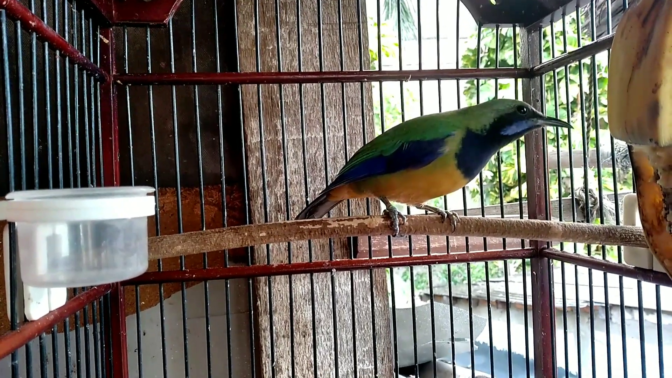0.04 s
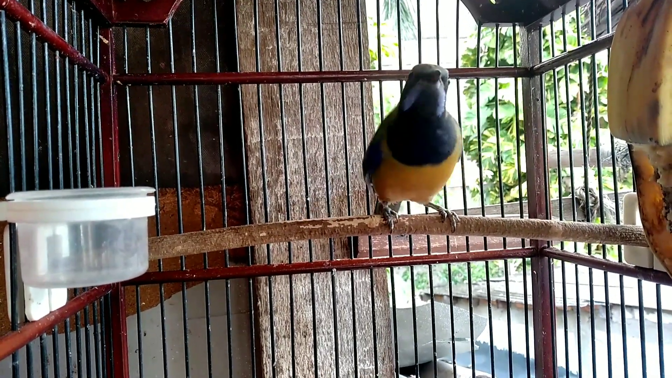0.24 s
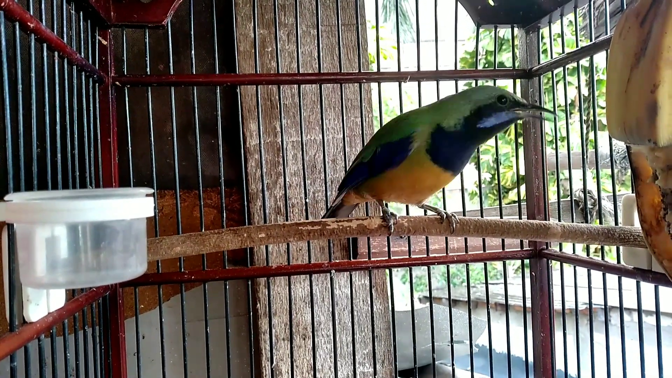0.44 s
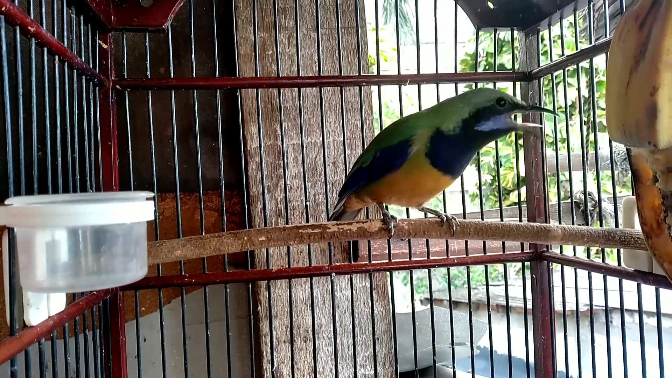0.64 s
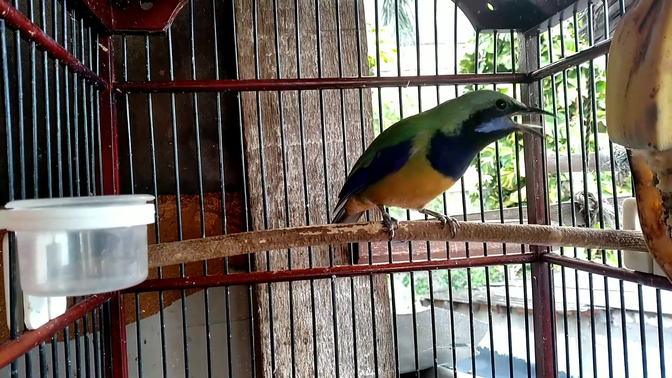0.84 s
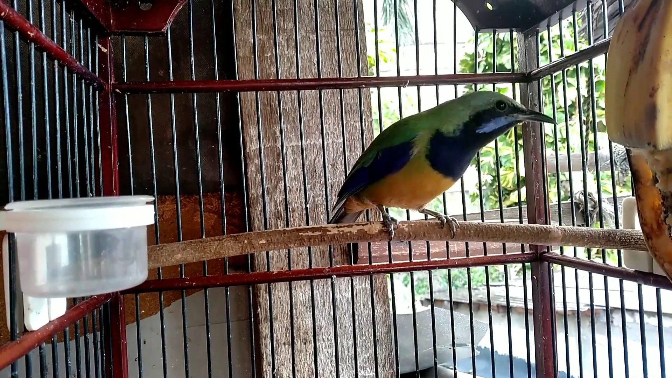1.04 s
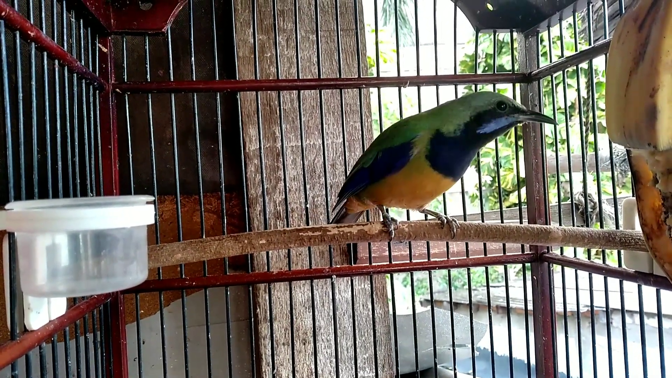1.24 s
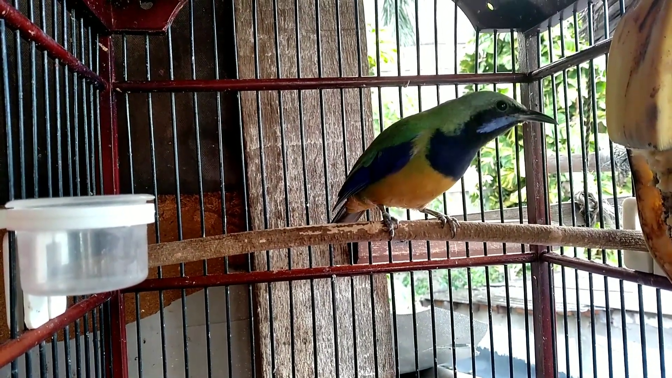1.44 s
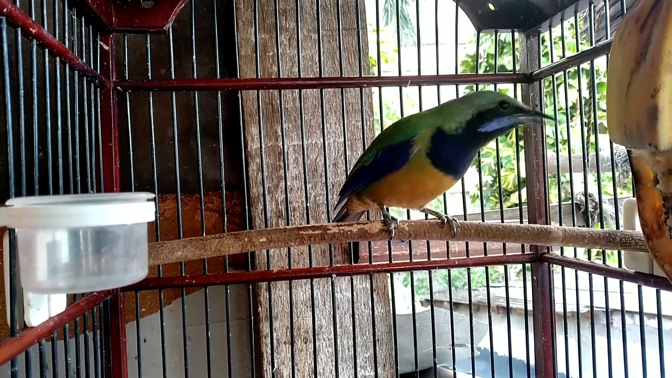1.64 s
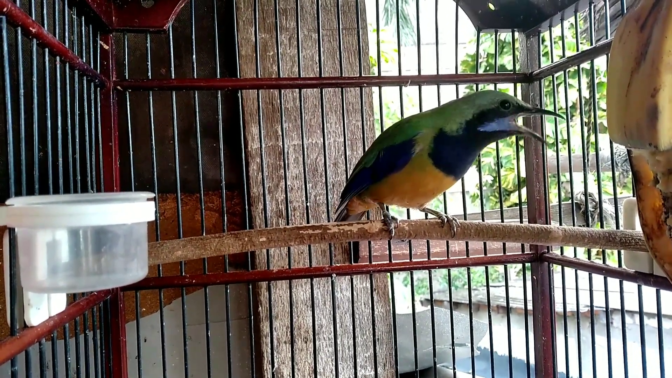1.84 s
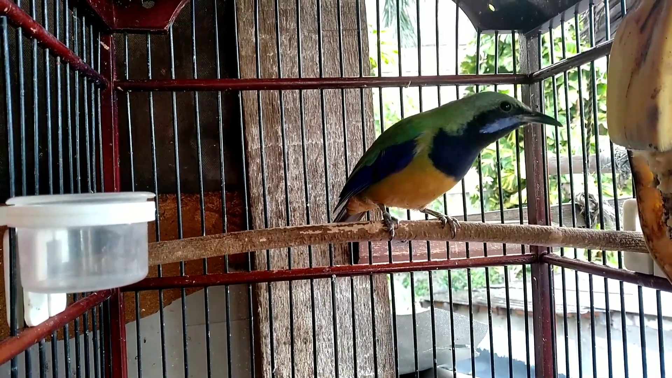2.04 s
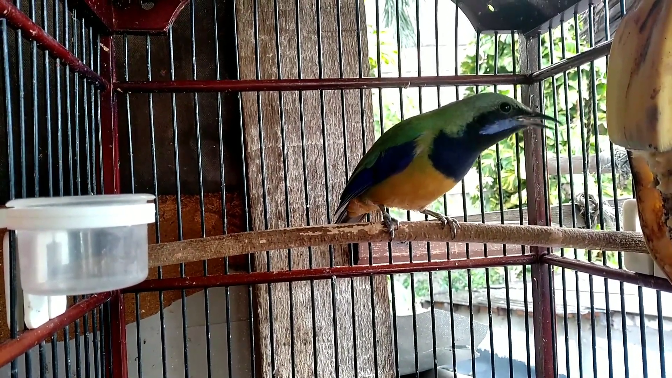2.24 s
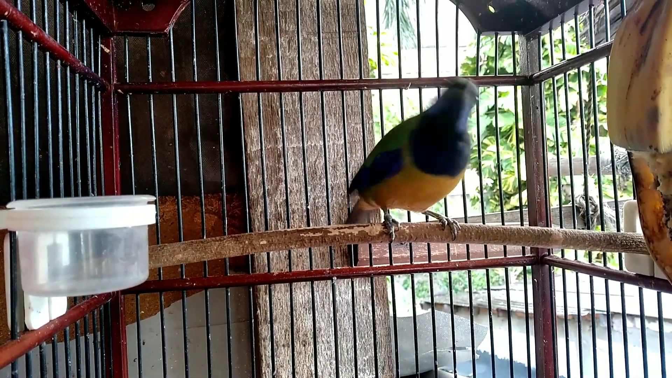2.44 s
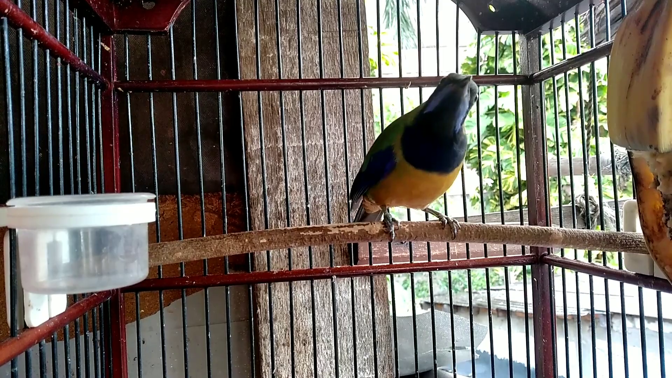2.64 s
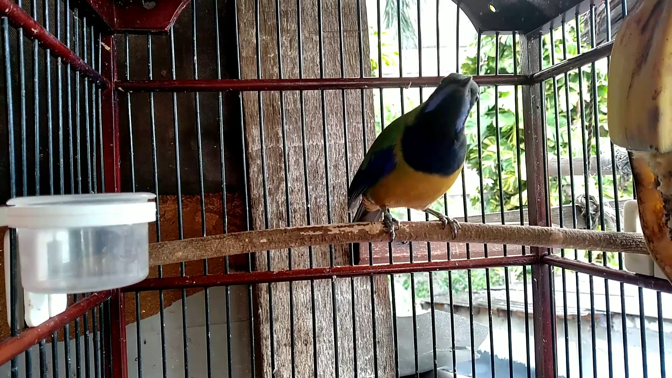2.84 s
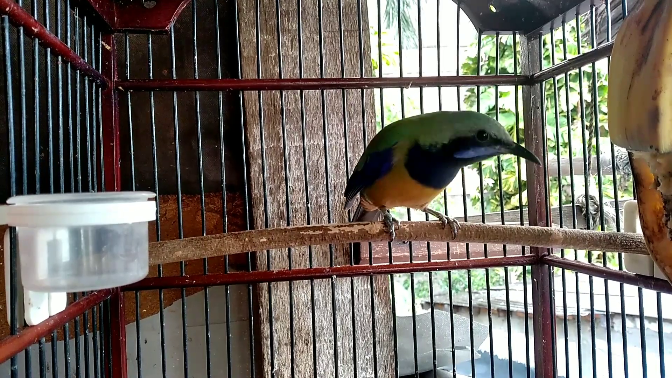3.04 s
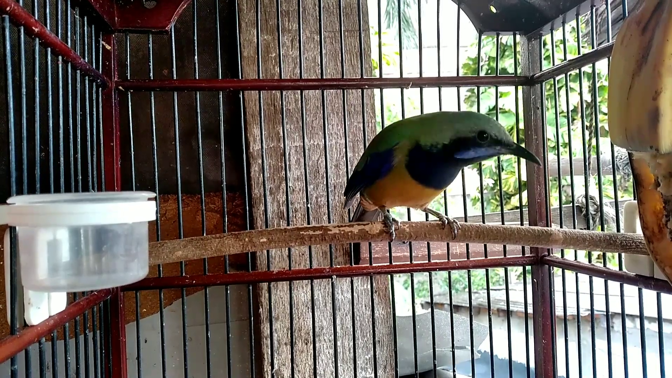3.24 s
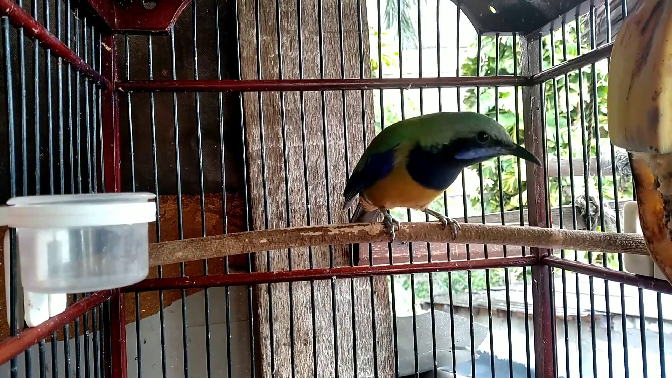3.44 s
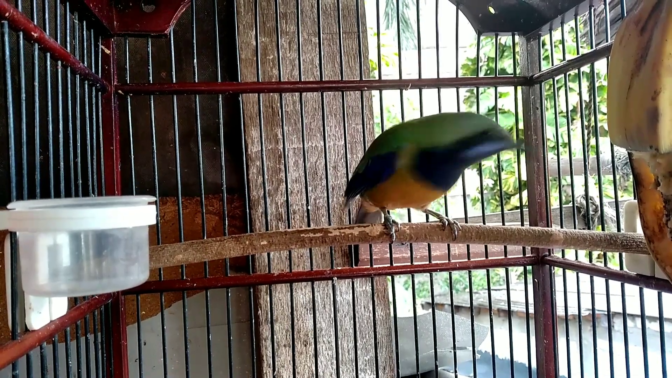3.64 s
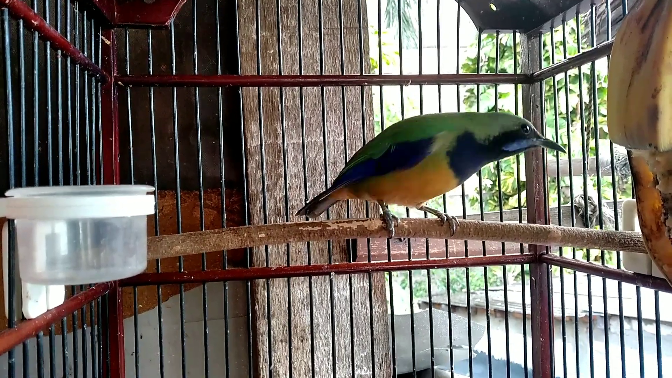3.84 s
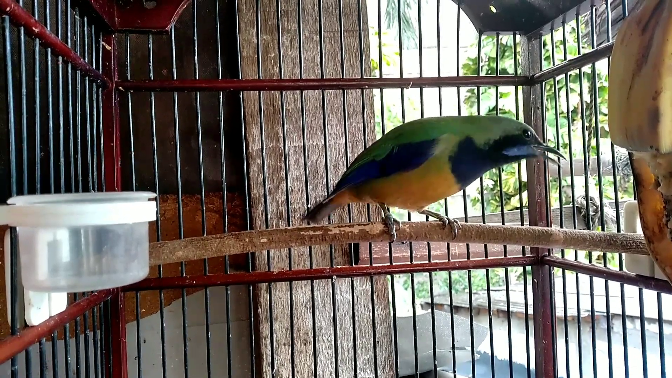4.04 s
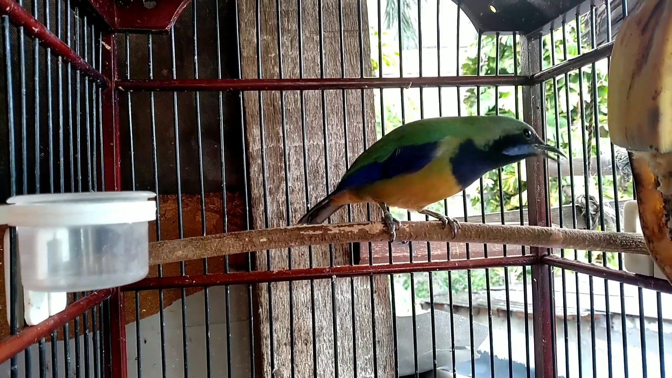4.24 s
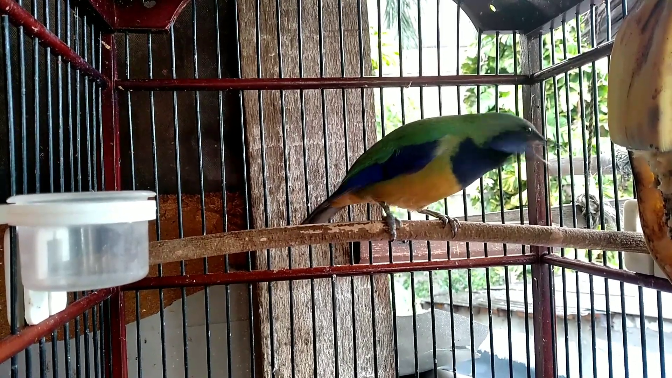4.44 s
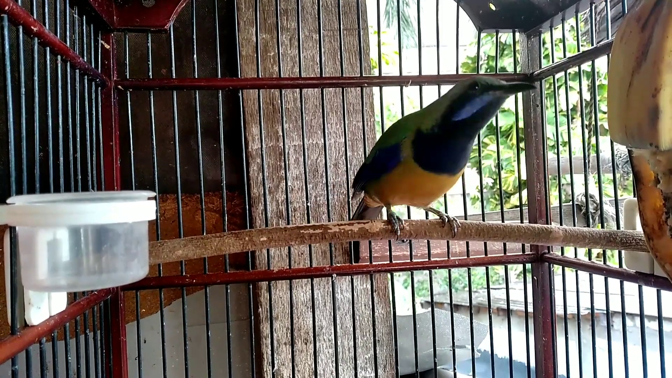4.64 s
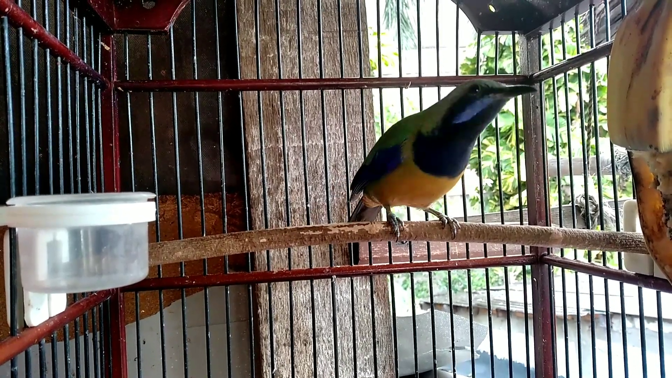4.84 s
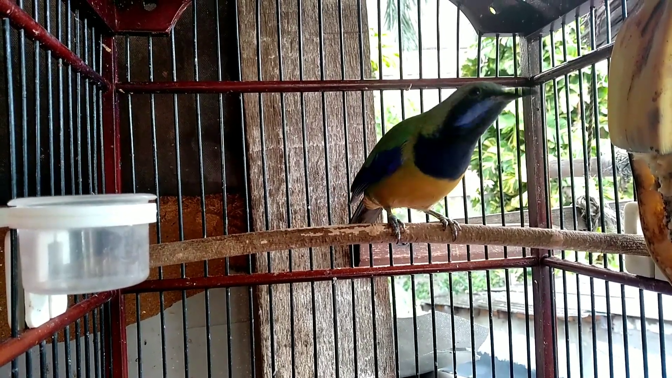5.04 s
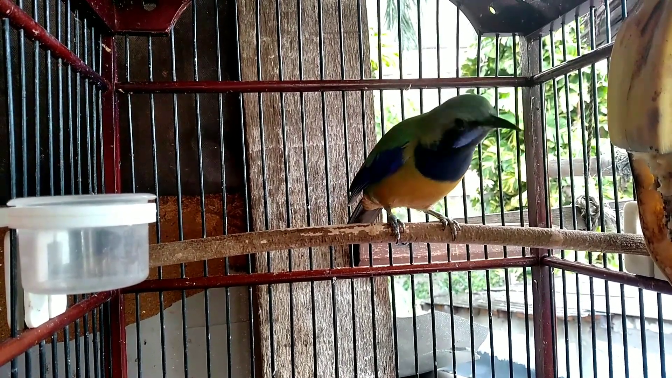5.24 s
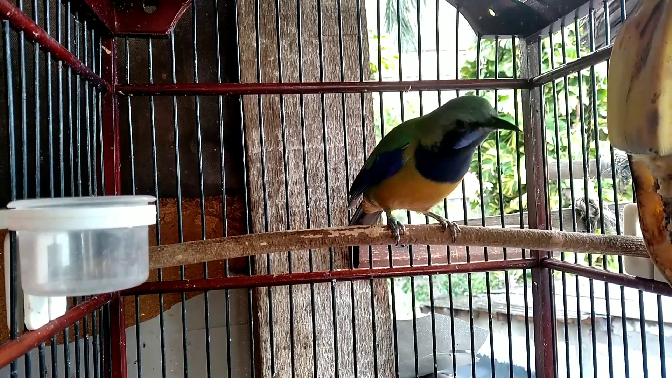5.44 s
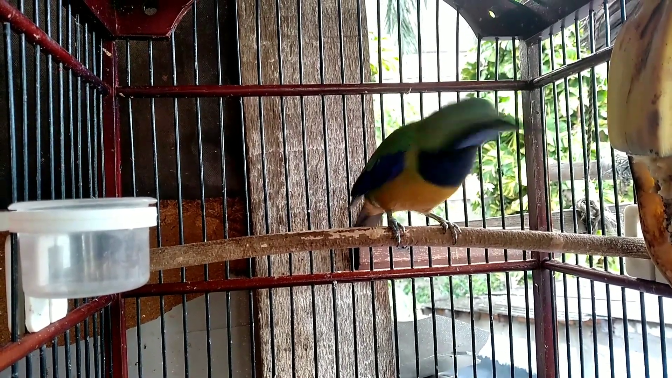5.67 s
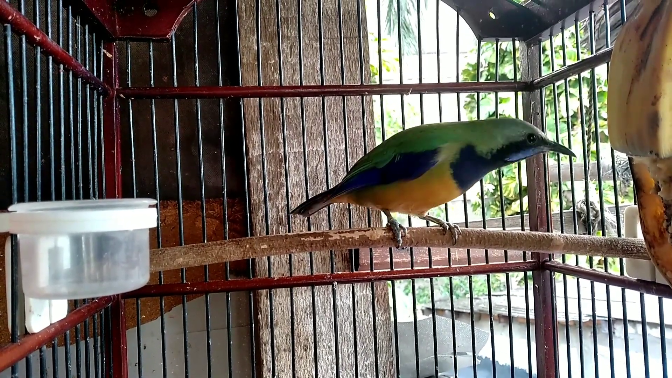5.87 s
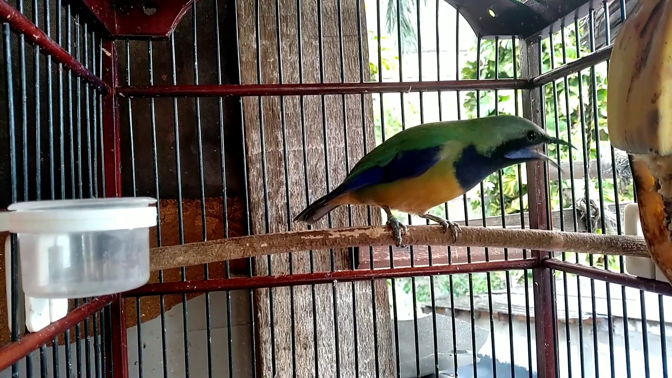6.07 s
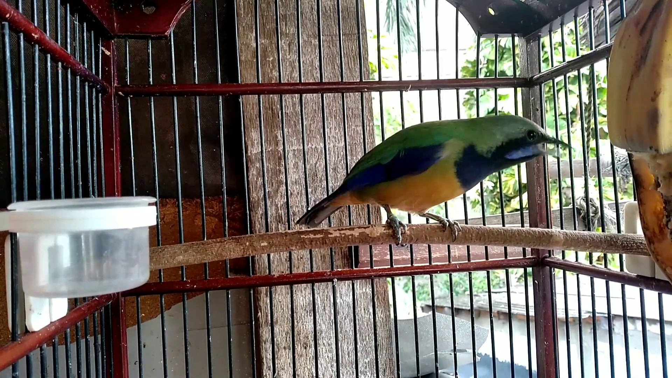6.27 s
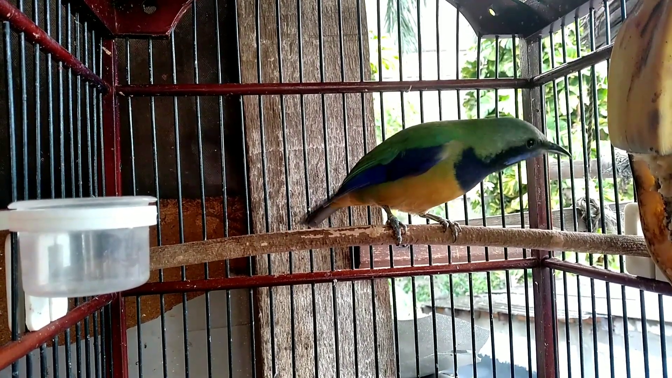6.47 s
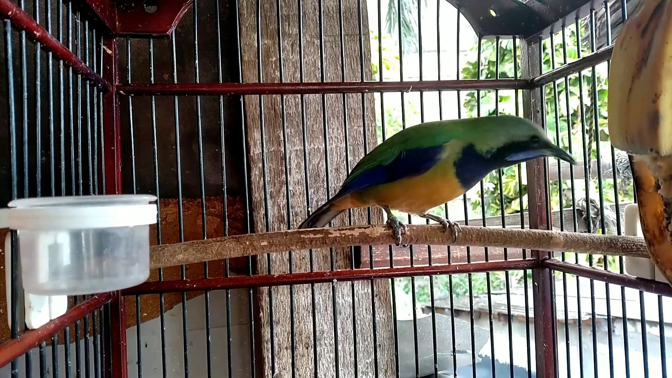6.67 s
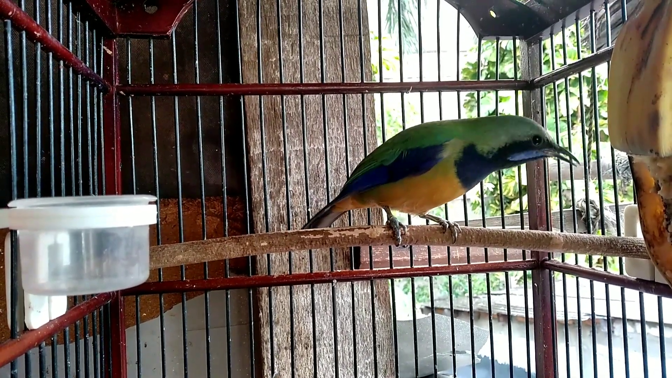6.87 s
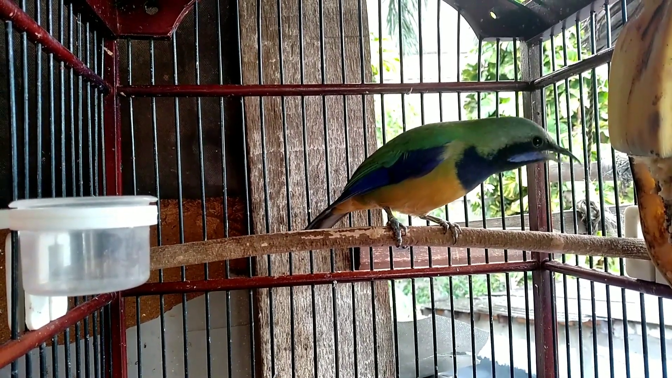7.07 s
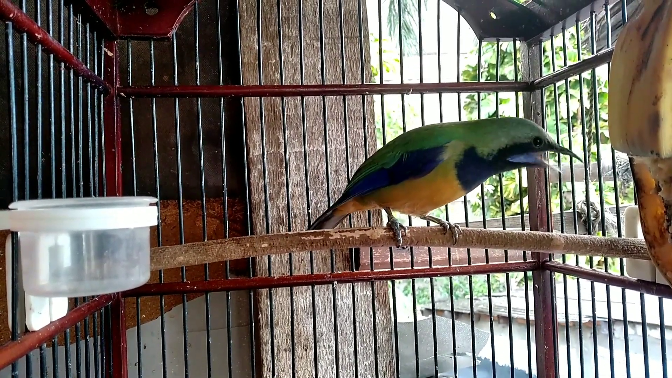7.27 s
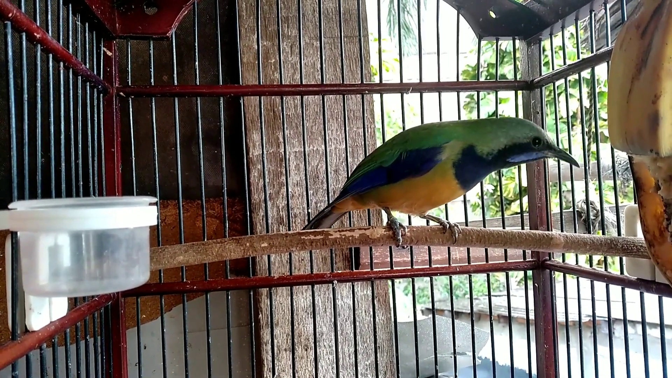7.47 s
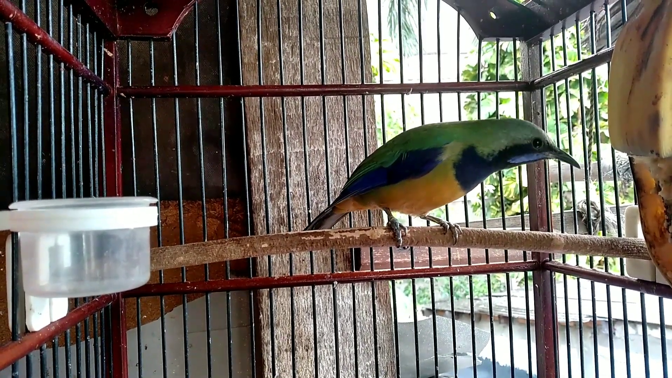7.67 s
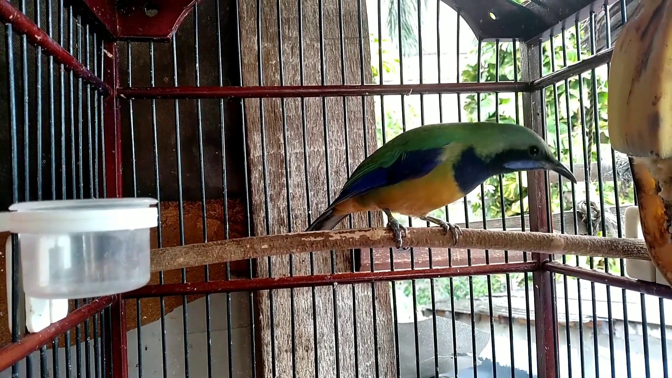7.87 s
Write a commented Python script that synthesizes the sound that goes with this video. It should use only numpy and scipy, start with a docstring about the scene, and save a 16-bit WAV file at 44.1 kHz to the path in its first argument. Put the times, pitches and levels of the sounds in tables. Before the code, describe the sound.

Loud, scratchy scolding calls from a bird very near the microphone, each starting with a tiny chirped note that breaks into hissing rasp. They come in groups, with one falling double squawk early on and quiet peeps and rustling midway. Cage wires ring faintly once, distant birds whistle softly, and a lumpy low hum with outdoor air fills the gaps in a small open space.

```python
"""An uneven low hum and outdoor noise are heard first; then a caged leafbird scolds close to a stereo microphone.
Most of its calls are an arched, nearly regular note that breaks into a rasp of chaotic slaps and hiss.
One call is a two-part squawk: a rising pulse train under a sinking resonance.
Soft peeps, rustles of filtered friction noise, ringing cage wires, far whistles and a thin whine surround it.
Short cage echoes, a small open room and two microphone ports shape the sound."""
import sys
import numpy as np
from scipy import signal
from scipy.fft import rfft, irfft, next_fast_len
from scipy.io import wavfile
from scipy.ndimage import uniform_filter1d, map_coordinates

SR = 44100
rng = np.random.default_rng(int(sys.argv[2]) if len(sys.argv) > 2 else 0)


def master(y):
    """Save y as 16-bit WAV."""
    cut = np.clip(np.atleast_2d(y).T, -1, 1)
    pcm = np.round(cut * 32767)  # scale
    wavfile.write(sys.argv[1], SR, pcm.astype(np.int16))


N = 348831
TIME, FREQS = np.arange(N) / SR, np.fft.rfftfreq(N, 1 / SR)

# Levels in the tables are relative: the gains of the mix come after them.
# Slow course of the low background: start_s [s], hum_db [dB], rumble_db [dB]
LOW_LEVELS = [(0.0, -38, -54), (0.81, -39, -45), (2.029, -51.5, -53), (2.23, -34.5, -43),
              (4.05, -36.5, -46), (4.46, -46, -51.5), (5.87, -33.5, -47.5), (6.28, -43, -56),
              (6.89, -35, -46.5), (7.9, -36.5, -44.5)]
# Spectrum of the rumble: frequency_hz [Hz], density_db [dB per Hz]
RUMBLE_SPECTRUM = [(30, -32), (60, -6), (110, 5.5), (160, 3), (220, 7), (300, -1.5), (430, -1), (600, -54)]
# Spectrum of the noise that accompanies the hum: frequency_hz [Hz], density_db [dB per Hz]
BOOM_SPECTRUM = [(20, -41), (65, 7), (130, 5.5), (280, -22.0), (450, -71.5)]
# Spectrum of the outdoor noise: frequency_hz [Hz], density_db [dB per Hz]
AIR_SPECTRUM = [(150, -35.5), (250, -28.5), (405, -5.5), (489, 0.5), (739, -3.5), (893, -5), (957, -9),
                (1180, -10.5), (1630, -13.5), (2260, -11.5), (3540, -19), (12200, -23.5), (14300, -34.5),
                (15300, -40.5)]
# Thin treble tone that stops part way: pitch_hz [Hz], level_db [dB], end_s [s]
WHINE = (14002, -74, 5.9)
# Whistles far outside: start_s [s], length_s [s], first_hz [Hz], middle_hz [Hz], last_hz [Hz], level_db [dB]
FAR_WHISTLES = [(0.996, 0.63, 1328, 1244, 1112, -52), (3.046, .24, 1130, 1184, 1268, -50.5),
                (4.976, .55, 1344, 1242, 1100, -51)]
# Rustles of feathers and feet: start_s [s], length_s [s], level_db [dB]
RUSTLES = [(2.223, 0.15, -35.5), (2.758, 0.091, -46), (4.718, 0.089, -48.5), (4.839, 0.12, -51),
           (5.076, 0.12, -36.5)]
# Spectrum of a rustle: frequency_hz [Hz], density_db [dB per Hz]
RUSTLE_SPECTRUM = [(470, -50.5), (800, -22), (2210, -6), (2500, -9), (2830, -4), (5420, -10), (10300, -12),
                   (13300, -39), (15000, -25)]
# Modes of the cage wires: pitch_hz [Hz], level_db [dB], t60_s [s]
WIRES = [(1646, -44, 1), (2060, -33, 0.3), (2755, -43.5, 0.63)]
# Soft peeps: start_s [s], length_s [s], first_hz [Hz], middle_hz [Hz], last_hz [Hz], level_db [dB]
PEEPS = [(4.617, 0.046, 3190, 3410, 3360, -41), (4.815, 0.032, 4300, 4370, 4370, -36),
         (4.904, 0.029, 6200, 6140, 6200, -39), (4.928, 0.0585, 6210, 5910, 6330, -47.5)]
# Syllables of the squawk: start_s [s], length_s [s], top_pitch_hz [Hz], level_db [dB]
SYLLABLES = [(2.501, .103, 920, -5), (2.595, 0.073, 854, -8.5)]
# Radiation of the squawk, the small bill sending out little bass: frequency_hz [Hz], gain_db [dB]
BILL_RADIATION = [(400, -19.5), (1000, -7.5), (1500, 1), (4300, -3), (5300, -6.5)]
# Source strength of harmonics 1, 2, .. of an opening note: level_db [dB]
NOTE_PARTIALS = [0, -3, -24, -25, -27]
# Response of the throat: frequency_hz [Hz], gain_db [dB]
THROAT = [(300, -49.5), (800, -29.5), (1100, -19), (1300, -30), (1580, -11), (1850, -17), (2450, -7),
          (3100, -7), (3400, -4), (3950, 3.5), (4400, -3), (5200, -23), (7000, -25.5), (15000, -58)]
# Spectrum of air in the open bill: frequency_hz [Hz], density_db [dB per Hz]
HISS = [(500, -51.5), (1100, -23.5), (1600, -6), (2700, -11), (4300, 5.5), (5200, 2.5), (6000, -2.5),
        (7100, -4), (8000, -3.5), (8800, -4), (11000, -4), (12200, -9.5), (14000, -9), (15500, -35)]
# Scolding calls: rasp_start_s [s], rasp_length_s [s], level_db [dB], hiss_against_throat_db [dB],
# rattle_depth [0-1], note_lead_s [s], note_top_hz [Hz; 0 means no opening note]
SCOLDS = [(0.3, 0.14, -12, -0.5, 0.93, .019, 1014), (.576, 0.12, -11, -8.5, 0.42, 0.027, 1179.5),
          (0.816, .13, -11, -7, .85, 0.03, 1440.5), (1.651, 0.26, -13.5, 4.5, .4, 0.0094, 0),
          (2.095, .15, -11.5, -5, 0.63, 0.025, 1247), (4.038, 0.21, -13, 3.5, 0, 0.026, 0),
          (4.356, .13, -12, -4.5, 0.8, 0.031, 1141.5), (6.01, 0.17, -12.5, -1.2, 0.2, 0.02, 983),
          (6.281, 0.12, -13, -5, .45, .028, 1509), (6.519, 0.12, -14, -4, 0.2, 0.025, 1372.5),
          (6.753, 0.13, -11.5, -9, 0.7, .024, 1288.5), (6.987, .13, -11.5, -9, 0.47, 0.031, 1357),
          (7.219, .14, -12, -5.5, 0.53, .022, 1462.5)]
# The bird at the two ports: frequency_hz [Hz], left_lead [radians], left_minus_right_db [dB]
PORTS = [(1000, 0, -1.5), (1600, 0, -.5), (2100, -.5, -2), (2400, .8, -3), (2850, -2, 5), (3300, 0, 1),
         (3600, 1.4, 2), (3950, 1.2, -2), (4300, 2.9, -1), (4800, 2.9, -1), (6200, 3.3, -2), (7500, 4.9, 1),
         (9000, 3.5, 1), (11200, 6.3, 7)]
# Colour of the cage echoes: frequency_hz [Hz], gain_db [dB]
CAGE_ECHO = [(200, -13), (1500, -10), (3000, -6), (4200, -10), (5500, -2), (14000, -1)]
# Colour of the room's reflections: frequency_hz [Hz], gain_db [dB]
ROOM_ECHO = [(3000, 0.0), (4200, -4.5), (5500, 2)]

# the hum swells and drops out at random; the rumble shares part of it
SWELL_DB, SWELLS_PER_S, RUMBLE_SHARE = 15, 15, .55
AIR_DB = -48.5
WIRES_START_S = .93
# in each syllable the pitch climbs from below
SCOOP_SHARE, SCOOP_S = .38, .023
# the voice is clear for a moment, then breaks up and weakens
CLEAR_S, CLEAR_FADE_S, ROUGH_CLEAR, ROUGH_BROKEN, BROKEN_DB = 0.0626, 0.013, 0.02004, 0.87, -7
# the bill closes steadily through both syllables, and the throat resonance sinks with it
BILL_OPEN_HZ, BILL_SINK_HZ_PER_S = 4240, 9900
# an opening note arches from and to these shares of its top pitch, and runs on into the rasp
NOTE_FROM, NOTE_TO, NOTE_OVERLAP_S = .64, .9, .012
# a note at full pitch is nearly as loud as its rasp; lower notes are much softer
NOTE_FULL_HZ, NOTE_BELOW_RASP_DB, NOTE_DB_PER_OCTAVE = 1308, -3.5, 34
# shares of a rasp over which it builds: the long ones start more softly
VOICE_RISE_SHARE, HISS_RISE_SHARE = 0.1, 0.11
EDGE_HZ = 15450


def amp(db):
    """Logarithmic level: converts decibels to an amplitude ratio."""
    return 10 ** (np.asarray(db) / 20)


def unit(x):
    """Mean power: scales a signal to rms 1."""
    return x / np.sqrt(np.mean(x ** 2) + 1e-20)


def read(points, hz):
    """Interpolation of a curve on a logarithmic frequency axis."""
    f, value = np.transpose(points)
    return np.interp(np.log(hz + 1), np.log(f), value)


def colour(x, spectrum):
    """Linear filtering: multiplies the spectrum of a sound by a gain curve in dB."""
    size = next_fast_len(x.shape[-1] + 512)
    gain = amp(read(spectrum, np.fft.rfftfreq(size, 1 / SR)))
    return irfft(rfft(x, size) * gain, size)[..., :x.shape[-1]]


def wander(size, hz):
    """Random modulation: smooth chance of rms 1 that changes hz times a second."""
    at = np.arange(size) * hz / SR
    return unit(map_coordinates(rng.standard_normal(4096), [at], order=3, mode="wrap"))


def gate(t, length, rise, fall):
    """Amplitude envelope: a rounded opening and closing."""
    return np.sin(np.pi / 2 * np.clip(np.minimum(t / rise, (length - t) / fall), 0, 1)) ** 2


def add(mix, s, sound):
    """Superposition: sums a sound into the mix from time s."""
    part = mix[..., max(round(s * SR), 0):][..., :sound.shape[-1]]
    part += sound[..., :part.shape[-1]]


def arch(length, first_hz, middle_hz, last_hz, jitter):
    """Frequency modulation: time and phase of a pitch that follows a parabola through three points."""
    t = np.arange(0, length, 1 / SR)
    parabola = np.polyfit([0, .55, 1], [first_hz, middle_hz, last_hz], 2)
    hz = np.polyval(parabola, t / length) * (1 + jitter * wander(len(t), 500))
    return t, 2 * np.pi * np.cumsum(hz) / SR


def noise_pair(spectrum, side):
    """Partial coherence: coloured noise of which both ports share a part."""
    shared, apart = colour(rng.standard_normal((2, N)), spectrum)
    return np.array([unit(shared) + side * unit(apart), unit(shared) - side * unit(apart)])


def patchy(x, depth_db, size):
    """Short-time spectral modulation: each band of a noise comes and goes by itself."""
    z = signal.stft(x, nperseg=2048, noverlap=1536)[2]
    patches = uniform_filter1d(rng.standard_normal(z.shape[1:]), size=size, axis=0)
    patches = unit(uniform_filter1d(patches, size=7, axis=1))
    modulated = z * amp(depth_db * np.tanh(patches))
    return unit(signal.istft(modulated, nperseg=2048, noverlap=1536)[1][:, :N])


def background(hum_hz=100, hum_db=-5.5, boom_db=-7, air_follows=0.085):
    """Modulated tone and noise: an unevenly swelling hum, patchy rumble and air that rises a little with it."""
    s, *levels = np.transpose(LOW_LEVELS)
    hum_level, rumble_level = (np.interp(TIME, s, level) for level in levels)
    swell = unit(amp(SWELL_DB * np.tanh(wander(N, SWELLS_PER_S))))
    phase = 2 * np.pi * hum_hz * TIME + .45 * wander(N, 22)
    hum = unit(np.sin(phase) + 0.13 * np.sin(2 * phase)) * amp([[-1.1], [1.1]])  # stronger on the right
    hum = hum + amp(boom_db) * noise_pair(BOOM_SPECTRUM, side=0.41)
    rumble = patchy(noise_pair(RUMBLE_SPECTRUM, side=.35), depth_db=14, size=5) * unit(swell ** RUMBLE_SHARE)
    air = patchy(noise_pair(AIR_SPECTRUM, side=.56), depth_db=4, size=4)
    air_level = AIR_DB + air_follows * (rumble_level - rumble_level.mean()) + 0.73 * wander(N, 5.3)
    return amp(hum_db + hum_level) * swell * hum + amp(rumble_level) * rumble + amp(air_level) * air


def whine():
    """Phase modulation: a thin, nearly steady tone far up in the treble."""
    hz, db, end = WHINE
    return amp(db) * unit(np.sin(2 * np.pi * hz * TIME + wander(N, 40))) * gate(TIME, end, .02, .1)


def whistle(length, first_hz, middle_hz, last_hz, level_db, jitter, overtone_db):
    """Harmonic series: a nearly pure tone with two weak overtones, for far whistles and peeps."""
    t, phase = arch(length, first_hz, middle_hz, last_hz, jitter)
    tone = np.sin(phase) + amp(overtone_db) * (np.sin(2 * phase) + 0.99 * np.sin(3 * phase))
    return amp(level_db) * unit(tone * gate(t, length, 0.063 * length, 0.28 * length))


def rustle(length, level_db):
    """Friction noise: a short, grainy brush."""
    t = np.arange(0, length, 1 / SR)
    grains = rng.standard_normal(len(t)) * amp(3 * wander(len(t), 504.5))
    return amp(level_db) * unit(colour(grains, RUSTLE_SPECTRUM) * gate(t, length, 0.024, 1.6 * length))


def wires():
    """Modal ringing: the thin cage wires sound as exponentially decaying sines."""
    t = np.arange(SR) / SR
    return sum(amp(db - 60 * t / t60) * np.sin(2 * np.pi * hz * t) for hz, db, t60 in WIRES)


def squawk(s, length, top_hz, level_db, width_hz=740, hiss_db=-19, attack_s=0.0044, release_s=0.012):
    """Source and filter: a rising pulse train, rough at both ends, drives a resonance that sinks."""
    t = np.arange(0, length, 1 / SR)
    hz = top_hz * (1 - SCOOP_SHARE * np.exp(-t / SCOOP_S))
    throat_hz = BILL_OPEN_HZ - BILL_SINK_HZ_PER_S * (s - SYLLABLES[0][0] + t)
    clear = gate(t, CLEAR_S, CLEAR_FADE_S, CLEAR_FADE_S)
    rough = np.clip(ROUGH_BROKEN + (ROUGH_CLEAR - ROUGH_BROKEN) * clear, 0, 1)
    broken = np.clip((t - CLEAR_S) / CLEAR_FADE_S, 0, 1)
    level = amp(level_db + BROKEN_DB * broken) * gate(t, length, attack_s, release_s)
    phase = 2 * np.pi * np.cumsum(hz * (1 + 0.04 * rough * wander(len(t), 600))) / SR
    pulses = unit(sum(np.cos(k * phase) for k in range(2, 18)))  # no fundamental
    drive = (1 - rough) * pulses + rough * rng.standard_normal(len(t))
    # a moving resonance: shift its centre to 0 Hz, apply a fixed two-pole low-pass, shift back
    turn = np.exp(2j * np.pi * np.cumsum(throat_hz) / SR)
    pole = np.exp(-2 * np.pi * width_hz / SR)
    ring = (turn * signal.lfilter([1], np.poly([pole, pole]), drive / turn)).real
    ring /= np.sqrt(uniform_filter1d(ring ** 2, size=600))  # even local power
    ring = colour(ring, BILL_RADIATION)
    hiss = unit(colour(drive + 0.438 * rng.standard_normal(len(t)), HISS))
    return level * (ring + amp(hiss_db) * hiss)


def note(length, first_hz, top_hz, last_hz, level_db, breath_db=-6, swell_db=10):
    """Nearly periodic vibration: harmonics through the throat swell and grow noisy."""
    t, phase = arch(length, first_hz, top_hz, last_hz, jitter=0.034)
    source = sum(amp(db) * np.sin((k + 1) * phase) for k, db in enumerate(NOTE_PARTIALS))
    tone = unit(colour(source * amp(2.55 * wander(len(t), 900)), THROAT))
    throat_air = unit(colour(rng.standard_normal(len(t)), THROAT))
    air = throat_air + 0.64 * unit(colour(rng.standard_normal(len(t)), HISS))
    swell = amp(swell_db * t / length) * gate(t, length, 0.012, 0.0096)
    return amp(level_db) * unit((tone + amp(breath_db) * air * np.sqrt(t / length)) * swell)


def closing(t, fall=0.05, first_hz=1450, last_hz=850):
    """Return to periodicity: as the air runs out, vibration turns regular again and sinks in pitch."""
    since = t - t[-1] + fall
    hz = np.interp(since, [0, fall], [first_hz, last_hz]) * (1 + 0.058 * wander(len(t), 700))
    phase = 2 * np.pi * np.cumsum(hz) / SR
    return (np.sin(phase) + .5 * np.sin(2 * phase)) * gate(since, fall, fall / 2, fall / 2)


def rasp(length, level_db, hiss_db, rattle, rattle_hz=68, slap_hz=1500, chaos=.35,
         squeal_hz=4150, squeal_db=-2.0, dull=3.7, closing_db=-19):
    """Chaotic vibration: membranes slap in bursts that ring the throat; air hisses through the open bill."""
    t = np.arange(0, length, 1 / SR)
    cycle = np.cumsum(rattle_hz * np.exp(0.27 * wander(len(t), 90))) / SR
    burst = np.sin(np.pi * cycle) ** 2
    depth = np.clip(rattle, 0, .95)
    turns = np.cumsum(slap_hz * np.exp(chaos * wander(len(t), 2500))) / SR
    slaps = np.diff(np.floor(turns), prepend=0)  # one impulse per turn
    throat = unit(colour((slaps - slaps.mean()) * (1 - depth + depth * burst), THROAT))
    # at the crest of each burst the vibration locks briefly into a squeal, which starts higher from a wide bill
    gape = 1 + 0.26 * amp(hiss_db) * np.exp(-t / .025)
    hz = squeal_hz * gape * (.76 + 0.28 * burst) * (1 + .055 * wander(len(t), 1100))
    squeal_level = burst ** 2 * amp(2 * wander(len(t), 150))
    squeal = unit(squeal_level * np.sin(2 * np.pi * np.cumsum(hz) / SR))
    # calls with weaker hiss have a duller top: dull is in dB per dB of hiss level
    treble_slope = [(11200, 0.013), (14000, dull * min(hiss_db + 0.5, 0))]
    breath = rng.standard_normal(len(t)) * (1 + 1.8 * depth * burst)
    hiss = unit(colour(colour(breath, HISS), treble_slope))
    # the hiss builds more slowly than the voice
    voice = throat + amp(squeal_db) * np.sqrt(depth) * squeal
    voice = voice * gate(t, length, VOICE_RISE_SHARE * length, 0.036) + amp(closing_db) * closing(t)
    hiss = hiss * gate(t, length, HISS_RISE_SHARE * length, 0.045)
    return amp(level_db) * unit(voice + amp(hiss_db) * hiss)


def scold(s, length, level_db, hiss_db, rattle, lead, note_hz):
    """Transition to chaos: an arched note, louder the higher it reaches, breaks into a rasp."""
    parts = [(s, rasp(length, level_db, hiss_db, rattle))]
    if lead > 0 and note_hz > 0:
        octaves_below = min(np.log2(note_hz / NOTE_FULL_HZ), 0)
        note_db = level_db + NOTE_BELOW_RASP_DB + NOTE_DB_PER_OCTAVE * octaves_below
        opening = note(lead + NOTE_OVERLAP_S, NOTE_FROM * note_hz, note_hz, NOTE_TO * note_hz, note_db)
        parts.append((s - lead, opening))
    return parts


def reflections(x, t60, delay):
    """Diffuse reverberation: convolution with dense dying echoes, different at each port."""
    t = np.arange(0, t60, 1 / SR)
    signs = rng.choice([-1., 1.], (2, len(t)))
    present = rng.random((2, len(t))) < 1 / 4
    taps = signs * present * amp(-60 * t / t60) * (t > delay)
    taps = taps / np.linalg.norm(taps, axis=1, keepdims=True)
    return signal.oaconvolve(x[None], taps, axes=1)[:, :len(x)]


def in_cage(x, t60=.075, turn_hz=7):
    """Early reflections: echoes off cage and wall at the two ports, which shift as the head moves."""
    x = np.pad(x, (0, 3300))  # room for the echo tail
    turn = 2 * np.pi * turn_hz * np.arange(len(x)) / SR
    echoes = sum(reflections(x * share, t60, delay=.0006) for share in (np.cos(turn), np.sin(turn)))
    return colour(echoes, CAGE_ECHO)


def ports(x):
    """Phase and level differences: direct sound reaches the two ports unlike in both."""
    table = np.array(PORTS)
    lead, balance_db = read(table[:, :2], FREQS), read(table[:, ::2], FREQS)
    half = np.exp(.5j * lead) * amp(balance_db / 2)  # half the difference to each port
    return irfft(rfft(x) * np.array([half, 1 / half]), N)


def scene(direct_db=-3.0, near_db=5.5, room_db=-11.0):
    """Superposition of direct sound, cage echoes and room with the world outside."""
    sounds = [(s, rustle(*row)) for s, *row in RUSTLES] + [(WIRES_START_S, wires())]
    sounds += [(s, whistle(*row, jitter=0.014, overtone_db=-23)) for s, *row in PEEPS]
    sounds += [(s, squawk(s, *row)) for s, *row in SYLLABLES]
    sounds += [part for row in SCOLDS for part in scold(*row)]
    bird, far, near = np.zeros(N), np.zeros(N), np.zeros((2, N))
    for s, sound in sounds:
        add(bird, s, sound)
        add(near, s, in_cage(sound))
    for s, *row in FAR_WHISTLES:
        add(far, s, whistle(*row, jitter=0.037, overtone_db=-11.5))
    room = colour(reflections(bird, t60=.22, delay=0.01), ROOM_ECHO)
    outside = reflections(far, t60=0.5, delay=0.0069) + background() + whine()
    return amp(direct_db) * ports(bird) + amp(near_db) * near + amp(room_db) * room + outside


def record(dry):
    """Amplitude and band limits: the loudest peaks clip, then a low-pass removes the top treble."""
    edge = signal.firwin(401, EDGE_HZ, window=("kaiser", 8), fs=SR)
    return signal.oaconvolve(np.clip(dry, -1, 1), edge[None], "same", axes=1)


dry = scene()
out = record(dry)
master(out)
```